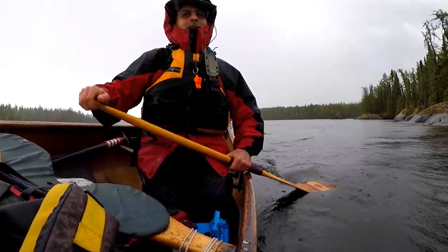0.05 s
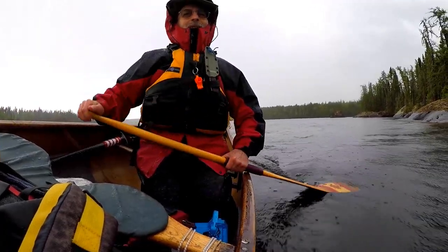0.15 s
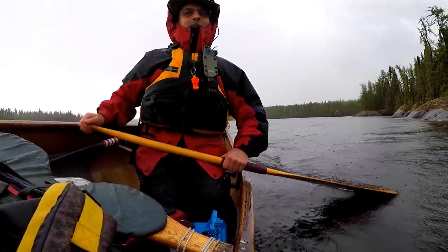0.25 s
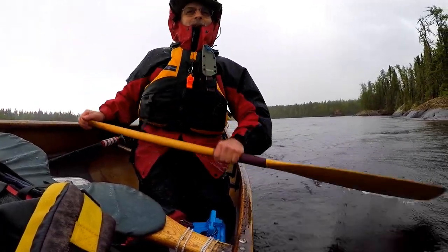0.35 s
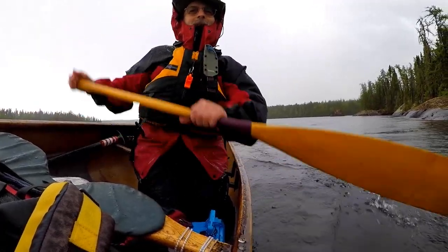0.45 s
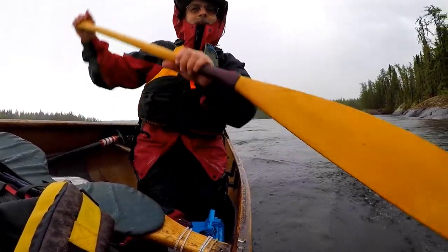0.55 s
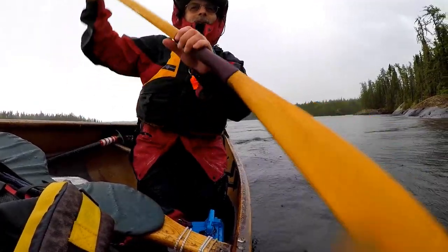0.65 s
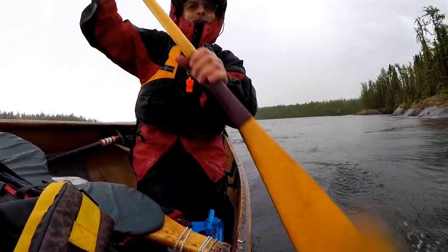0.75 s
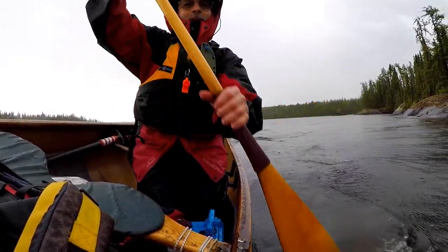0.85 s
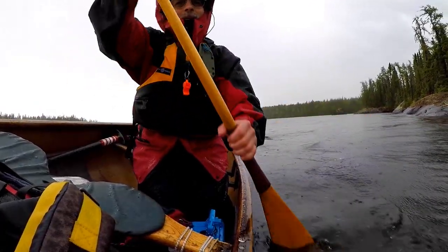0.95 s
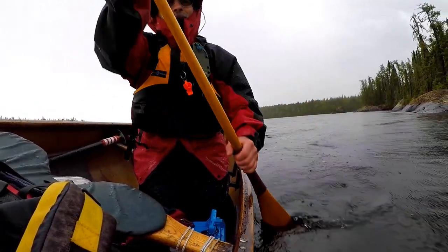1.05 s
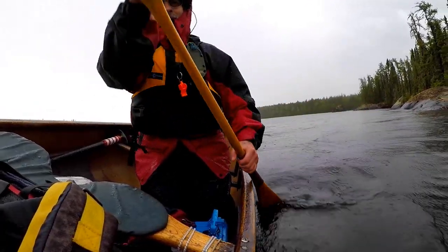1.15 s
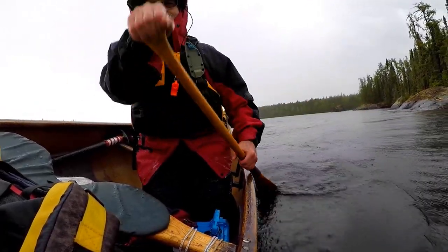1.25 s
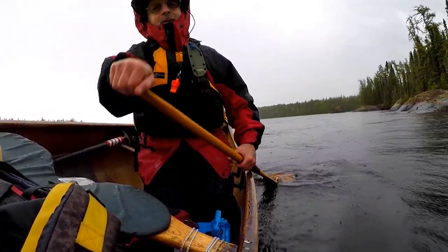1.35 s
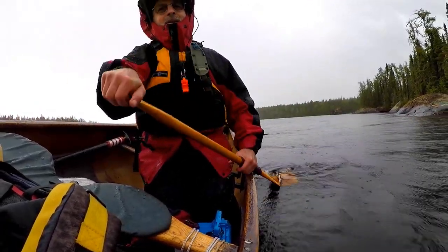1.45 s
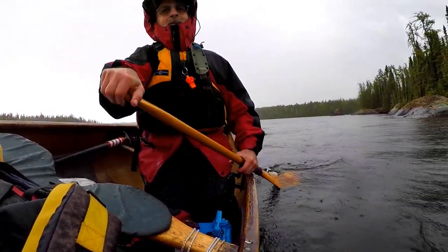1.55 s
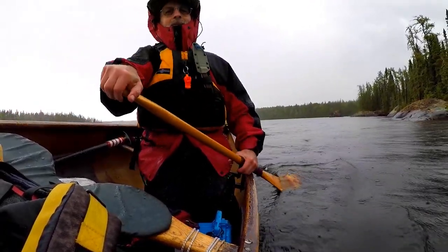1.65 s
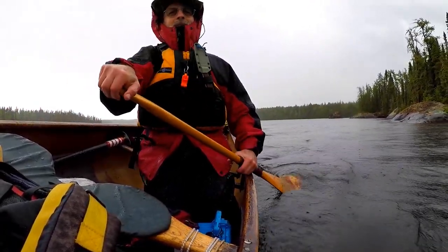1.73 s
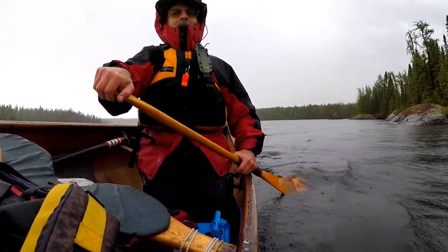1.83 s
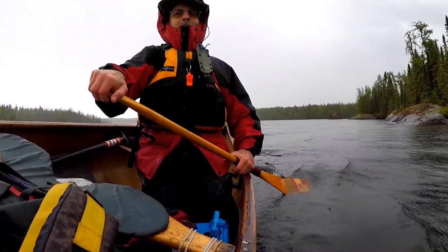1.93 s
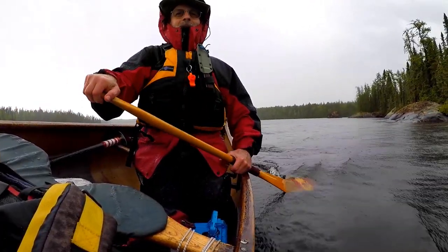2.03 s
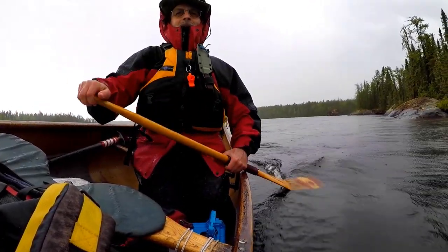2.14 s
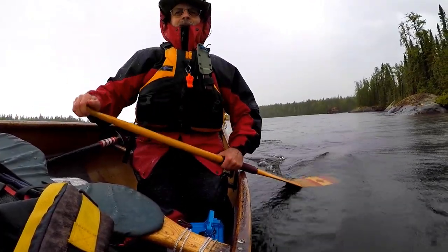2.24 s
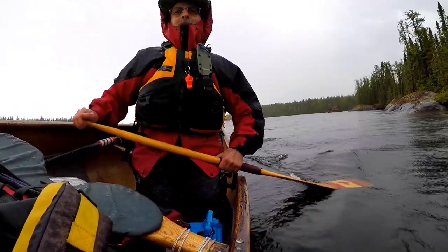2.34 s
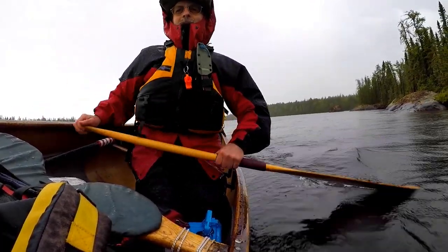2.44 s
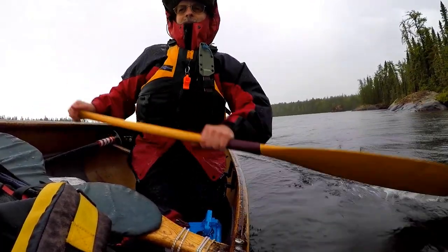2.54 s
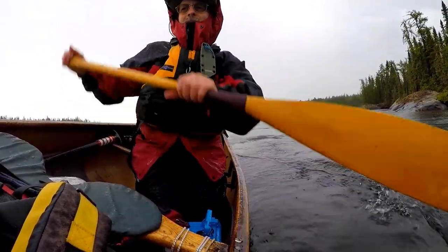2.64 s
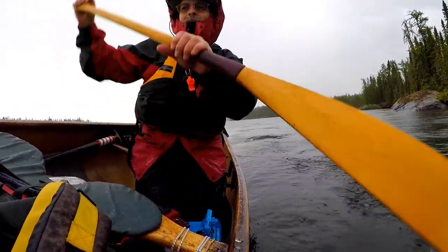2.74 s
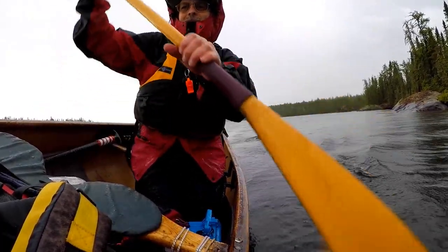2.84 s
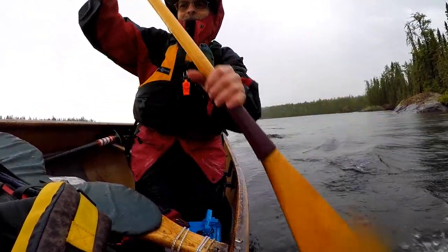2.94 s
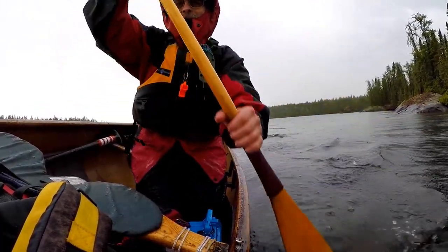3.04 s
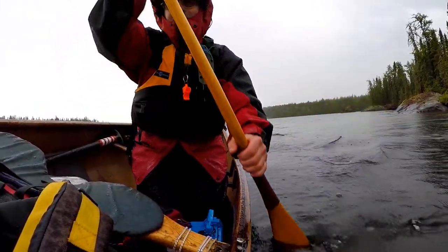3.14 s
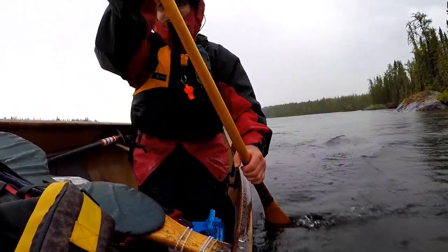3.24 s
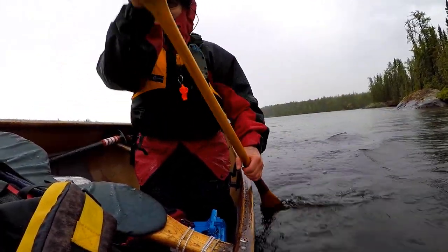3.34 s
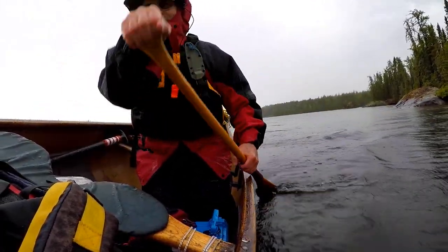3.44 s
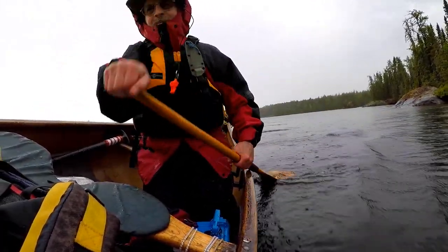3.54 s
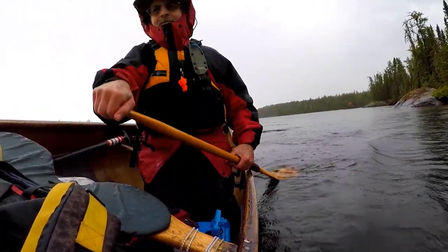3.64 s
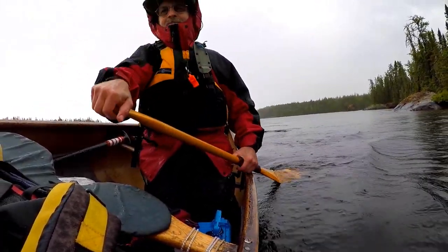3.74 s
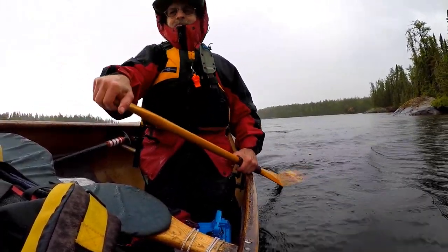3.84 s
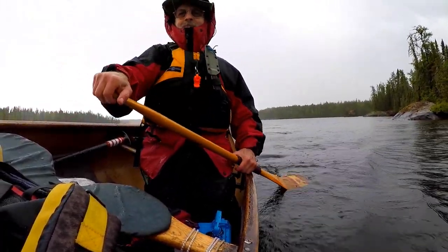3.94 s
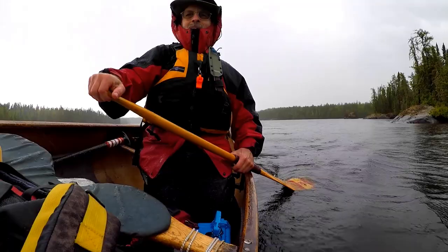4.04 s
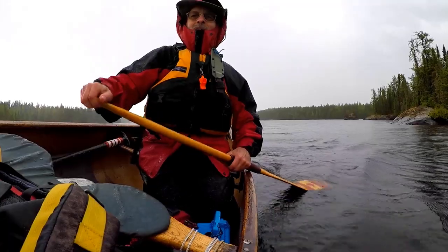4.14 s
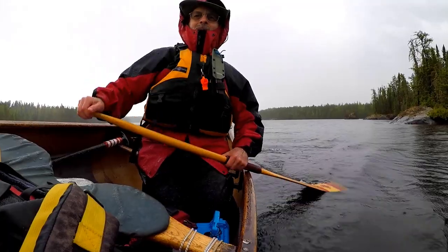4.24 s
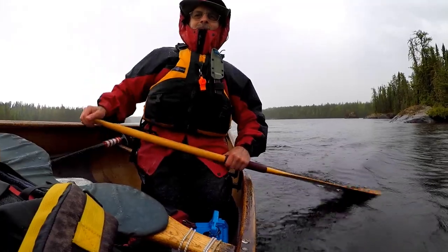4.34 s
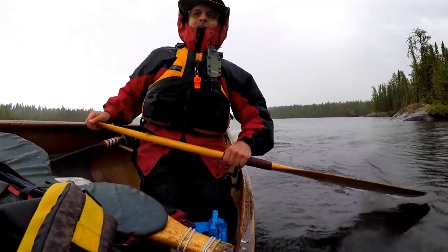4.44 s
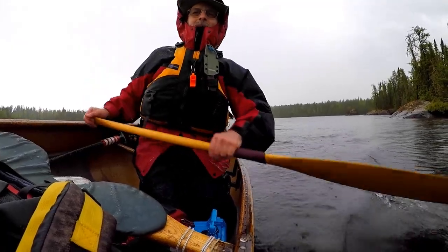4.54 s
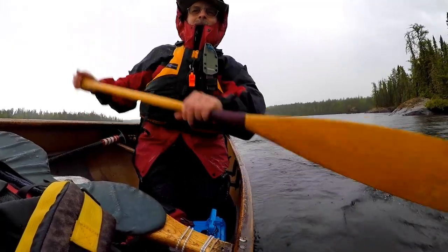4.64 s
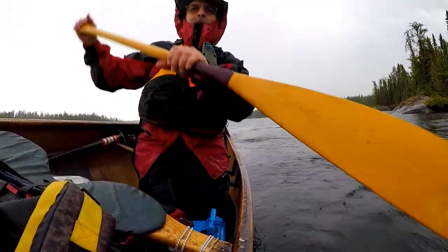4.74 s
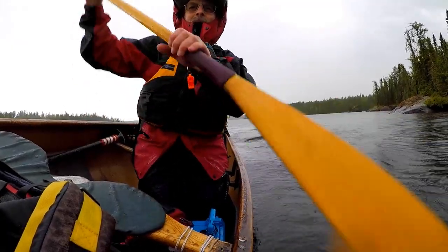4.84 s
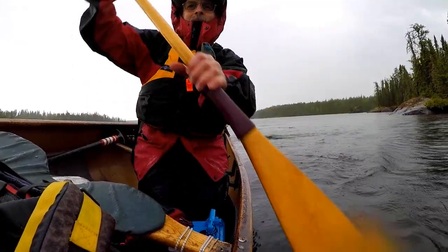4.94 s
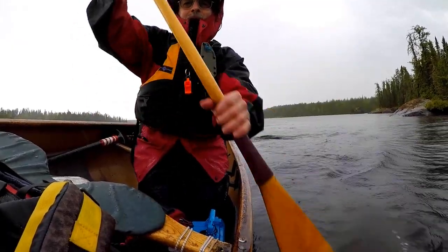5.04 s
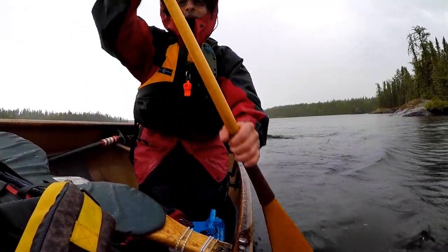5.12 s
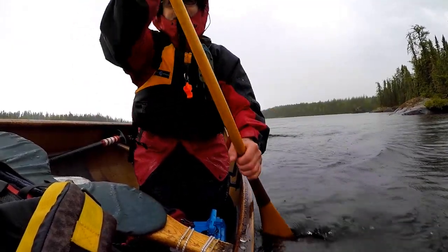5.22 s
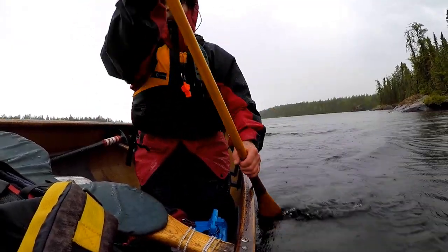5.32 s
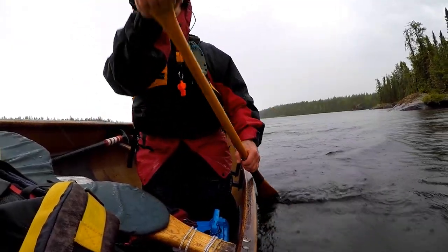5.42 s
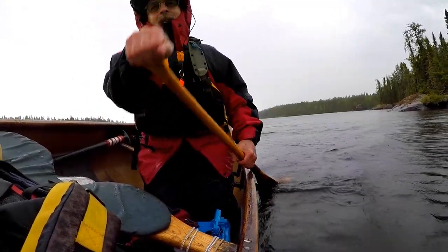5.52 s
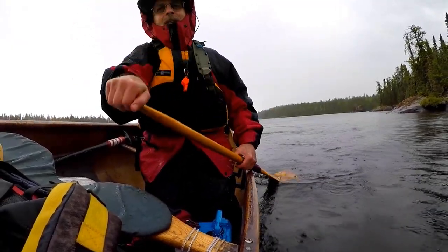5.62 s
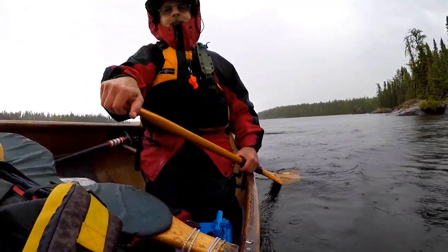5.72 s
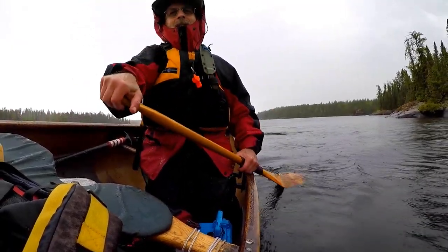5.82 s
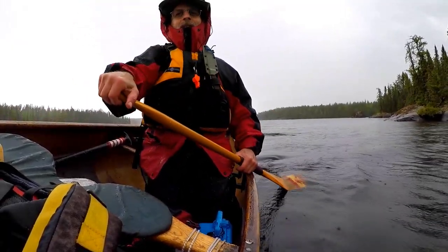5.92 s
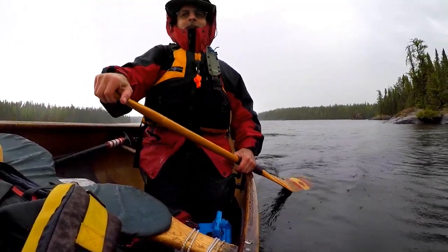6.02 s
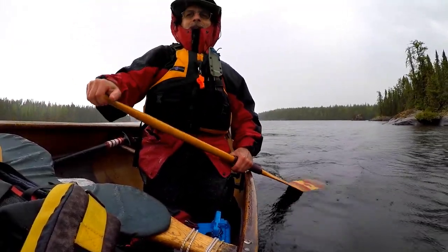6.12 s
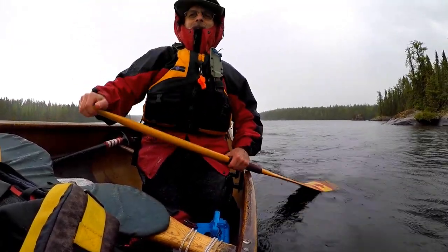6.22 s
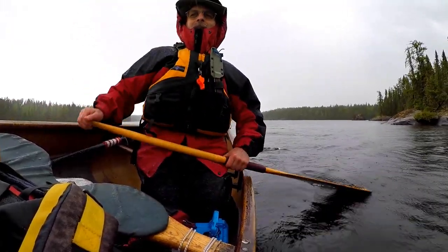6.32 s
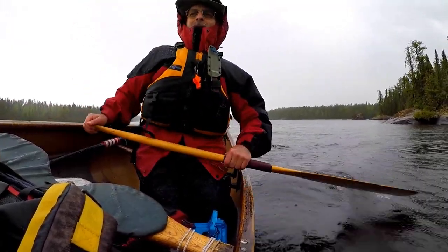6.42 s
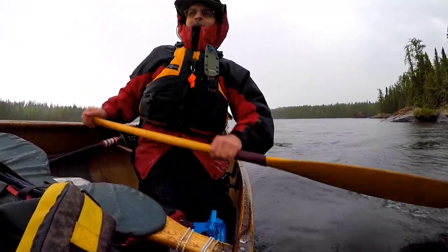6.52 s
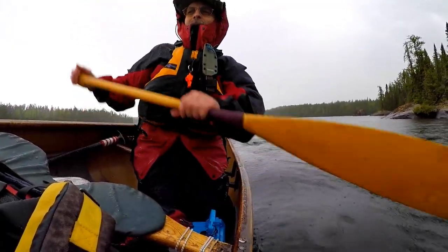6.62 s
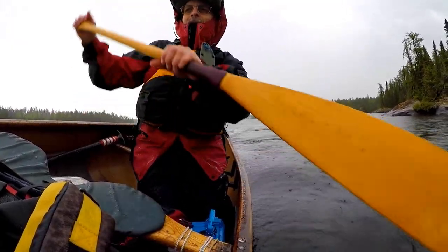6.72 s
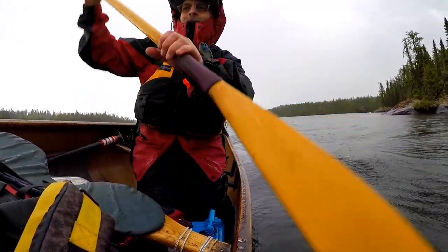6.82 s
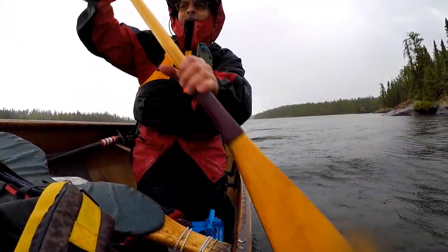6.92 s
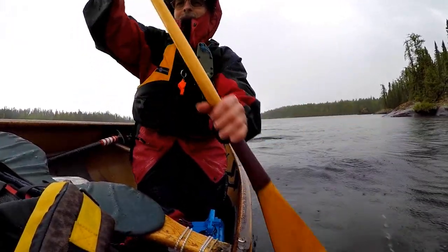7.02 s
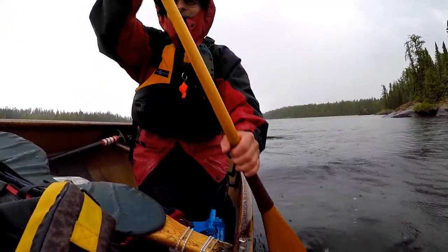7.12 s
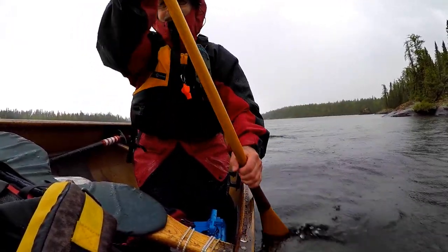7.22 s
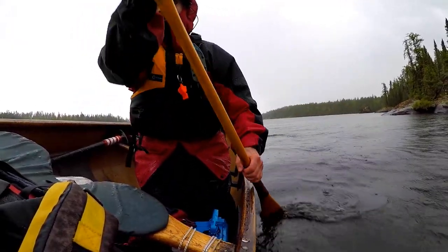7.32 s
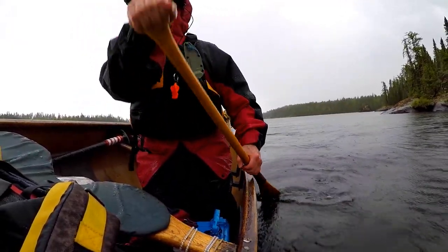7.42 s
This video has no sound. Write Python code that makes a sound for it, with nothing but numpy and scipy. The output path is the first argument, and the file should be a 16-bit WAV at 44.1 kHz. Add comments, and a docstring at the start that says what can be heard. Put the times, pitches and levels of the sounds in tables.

```python
"""Canoe on an open lake, light rain

The microphone is a small camera's, fixed to the hull of a paddled canoe, with no echo off the open water.
On the port itself: wind, as three bands of shaped noise. Through the hull: gulps, sagging tones.
Close by: water and splashes (bubble crowds), plops (rising tones), and drops that ring the housing,
with wide cracks, bright snaps and dull bodies of shaped noise. Far off: rain, a wavering hiss.
Patches and bands of treble hiss come and go, made of short high grains and noise.
"""
import sys
import numpy as np
from scipy import signal
from scipy.fft import rfft, irfft, next_fast_len
from scipy.io import wavfile
from scipy.ndimage import uniform_filter1d

SR = 44100
rng = np.random.default_rng(int(sys.argv[2]) if len(sys.argv) > 2 else 0)


def bounce(signal):
    """Save signal as a 16-bit WAV file at the path given by the first command-line argument."""
    frames = np.transpose(np.atleast_2d(signal))
    limited = np.clip(frames, -1, 1)
    pcm = np.round(limited * 32767).astype(np.int16)
    wavfile.write(sys.argv[1], SR, pcm)


N = 329406

# wind at the port: [t/s, slow push level/dB, deep buffet level/dB, faster flutter level/dB]
WIND_LEVELS = [(0.0, -50, -21, -30), (0.04, -13, -22.5, -30), (1.1, -26, -24.5, -29),
               (1.58, -18.5, -32.5, -29), (1.93, -22, -23, -28.5), (2.77, -18.5, -17.5, -23),
               (3.06, -39, -33.5, -32.5), (3.14, -15, -15.5, -24.5), (3.29, -27, -20, -28),
               (3.58, -20.5, -38, -20), (3.68, -32, -29.5, -29), (3.95, -23.5, -38, -35),
               (4.31, -17, -17.5, -21), (4.45, -18, -18, -24), (5.26, -26.5, -33.5, -29),
               (5.45, -21, -27, -18.5), (5.66, -16.5, -22.5, -32), (5.97, -17, -36.5, -28.5),
               (6.22, -11.5, -18, -25.5), (6.72, -29, -33.5, -33), (7.39, -17, -17.5, -28.5),
               (7.47, -61, -49, -29)]
# spectra of the three wind layers: [f/Hz, level/dB]
PUSH_SPECTRUM = [(4, -20), (10, -3.5), (20, -1), (30, -4.5), (50, -35)]
BUFFET_SPECTRUM = [(18, -29), (30, -35), (45, -10.5), (70, -11.5), (100, -13.5), (150, -42), (300, -58)]
FLUTTER_SPECTRUM = [(40, -64.5), (80, -5), (130, 1), (200, -4.5), (260, -14), (400, -28), (700, -32),
                    (1200, -55)]
# swash along the hull, before its flicker: [t/s, level/dB]
WATER_LEVELS = [(0.0, -41), (1.1, -44.5), (3.1, -44), (3.56, -43.5), (3.68, -50.5), (3.95, -51.5),
                (4.35, -45.5), (5.32, -43.5), (5.91, -51), (6.26, -42), (6.8, -47.5), (7.09, -40.5),
                (7.47, -58.5)]
# spectrum shared by swash, splashes and dull bodies: [f/Hz, level/dB]
SWASH_SPECTRUM = [(250, -0.5), (400, -5.5), (700, -4.5), (1000, -4), (1600, -1.5), (2400, 0), (2800, -4.5),
                  (3200, -8), (4300, -46.5)]
# rain on the far lake, before it wavers: [t/s, level/dB]
RAIN_LEVELS = [(0.0, -61), (3.1, -60.5), (3.87, -68), (4.72, -58), (5.1, -61), (5.87, -61), (7.47, -59.5)]
# spectrum of the far rain: [f/Hz, level/dB]
RAIN_SPECTRUM = [(1650, -36), (2800, -22.5), (3380, -1), (4900, -6), (6800, -6), (10100, -5.5),
                 (12800, -14), (15200, -17.5), (15800, -42)]
# larger drops on the housing: [t/s, low ring drive level/dB, high ring drive level/dB]
HOUSING_DROPS = [(.02, -39, -42), (.439, -46, -70), (2.787, -45, -49), (3.016, -51, -41), (3.205, -46, -71),
                 (5.903, -36, -52), (5.992, -50, -38), (0.1566, -33, -42), (0.17, -31.5, -51),
                 (0.182, -37, -50), (0.2054, -31, -44), (0.2224, -22, -22.5), (0.4088, -27.5, -36),
                 (0.5482, -41, -38.5), (0.629, -35, -37), (0.6446, -32.5, -29), (0.749, -39, -60),
                 (.651, -38, -38.5), (2.408, -48.5, -50), (4.522, -41, -42), (4.825, -55, -45),
                 (4.901, -50, -39), (5.412, -39, -33), (1.0164, -27, -20), (1.1236, -38.5, -56),
                 (1.1505, -26, -55), (1.1954, -27.5, -41), (1.225, -38, -58), (1.504, -28, -48),
                 (1.623, -45, -48), (1.6302, -39.5, -37), (2.14, -41.5, -58), (2.3171, -30, -33),
                 (2.3406, -32, -40), (2.5234, -33, -40), (2.647, -27.5, -24.5), (2.8903, -42, -57),
                 (3.042, -34, -46), (3.0545, -27, -30), (3.0746, -33, -30), (3.0884, -26.5, -29),
                 (1.101, -50, -51.5), (1.838, -49, -52), (4.132, -43.5, -62), (3.1273, -40, -55),
                 (3.2375, -34, -52), (3.4111, -34, -53), (3.4431, -37, -52), (3.5982, -44, -59),
                 (3.641, -36.5, -65), (4.391, -31.5, -30.5), (4.4884, -28, -28.5), (4.5421, -38.5, -39),
                 (4.671, -30, -22), (4.882, -29, -54), (4.9197, -32.5, -55), (5.2902, -17, -55),
                 (5.3835, -43, -34), (5.3993, -24, -23), (5.406, -17.5, -44), (5.7216, -42, -39),
                 (5.7869, -25, -29), (5.9653, -28.5, -37), (6.1779, -43, -54), (6.26, -38.5, -41),
                 (6.4597, -28, -27), (6.614, -35, -23.5), (6.7501, -32, -31.5), (6.982, -30, -53),
                 (7.0374, -45, -38), (7.0652, -18.5, -16), (7.106, -46, -30), (7.3442, -29, -34.5)]
# housing modes, low and high: [f/Hz, level/dB relative to the drive]
LOW_MODES = [(2600, 1), (3600, 1)]
HIGH_MODES = [(4600, 1), (5700, -1.5)]
# spectrum of a drop's wide crack: [f/Hz, level/dB]
CRACK_SPECTRUM = [(1500, -16), (3400, 14), (5000, 4.5), (7200, -3), (9500, -3), (11500, -23), (12800, -8),
                  (15000, -25.5)]
# bright snap of a drop, often together with its ring: [t/s, level/dB before the spectrum]
DROP_SNAPS = [(0.2059, -42), (0.2225, -37), (0.6432, -37.5), (0.747, -39.5), (1.0174, -42.5),
              (1.1506, -32.5), (1.505, -41.5), (2.317, -41), (2.3401, -39), (2.7781, -40), (2.8769, -46),
              (2.8898, -38), (3.5982, -42), (3.9763, -40.5), (4.3894, -32.5), (4.4877, -38.5),
              (4.9013, -39), (4.9202, -37), (5.29, -40), (5.3842, -34.5), (5.7873, -38), (6.4597, -35.5),
              (6.6144, -46), (6.7506, -47), (6.983, -33.5), (7.0983, -40)]
# spectrum of a bright snap: [f/Hz, level/dB]
SNAP_SPECTRUM = [(6000, -37), (8500, 4.5), (11000, -2.5), (12800, 1), (15500, -12.5)]
# bursts of churned water at blade and hull: [t/s, level/dB, 60 dB decay/s]
SPLASH_BURSTS = [(0.109, -34.5, 0.45), (0.723, -26, 0.17), (1.199, -21.5, 0.29), (2.499, -35.5, 0.12),
                 (2.629, -32, 0.1), (2.856, -22.5, 0.19), (3.004, -31.5, 0.38), (3.477, -30, 0.26),
                 (4.368, -40.5, 1), (4.902, -28, 0.15), (5.409, -40, 0.86), (5.481, -36, 0.082),
                 (5.932, -37, 0.22), (6.35, -38.5, 0.14), (6.875, -30, 0.44), (7.255, -43, 0.35),
                 (7.349, -36, 0.52)]
# air pockets gulped by the blade, before roughening: [t/s, level/dB, starting f/Hz, length/s]
AIR_POCKETS = [(0.113, -15.5, 260, 0.017), (.13, -10, 170, 0.025), (0.218, -15, 227, 0.037),
               (0.291, -20, 215, 0.042), (1.184, -3, 222.4, 0.073), (1.226, -1.5, 219, 0.067),
               (1.266, -6.5, 260.5, 0.038), (1.29, -7.5, 201, 0.06), (1.407, -12.5, 206, 0.025),
               (1.773, -11, 144, 0.047), (2.86, -8.5, 200, 0.053), (3.177, -8, 149, 0.027),
               (3.458, -4, 209, 0.021), (3.473, 0, 301.6, 0.026), (3.492, -7, 135, 0.077),
               (3.606, -11.5, 314, 0.034), (3.642, -16.5, 250, 0.034), (4.381, -16, 218, 0.031),
               (4.665, -23.5, 344, 0.016), (5.289, -2, 110, 0.022), (5.303, -5, 290, 0.022),
               (5.322, -11.5, 241, 0.029), (5.378, -11, 215, 0.041), (5.455, -8.5, 329, 0.026),
               (5.467, -4.5, 134, 0.05), (5.524, -13.5, 107, 0.081), (5.734, -23.5, 378, 0.043),
               (5.884, -16, 344, 0.022), (5.9, -11, 195, 0.04), (6.865, -20.5, 215.6, 0.11),
               (7.059, -12, 350, 0.021), (7.122, -16, 151, 0.02), (7.255, -11.5, 301, 0.013),
               (7.27, -2.5, 263, .03), (7.308, -8.5, 145.5, 0.076), (7.344, -8, 97.5, 0.053),
               (7.391, -3.5, 163, 0.025)]
# single bubbles and plops, before roughening: [t/s, level/dB, starting f/Hz, 60 dB decay/s]
SINGLE_BUBBLES = [(.123, -29, 1070, 0.014), (.158, -21.5, 724, 0.031), (.168, -24.5, 2330, 0.016),
                  (0.222, -12, 790, 0.0025), (.549, -23, 706, 0.017), (0.688, -26, 1270, 0.033),
                  (0.74, -15, 479, 0.048), (0.737, -20, 2280, .012), (.745, -12, 1700, 0.0025),
                  (.749, -16, 2250, 0.022), (.768, -28, 1540, 0.027), (.789, -34, 2250, 0.036),
                  (.851, -34.5, 2400, 0.051), (0.895, -27.5, 2240, 0.024), (.95, -34.5, 2040, 0.041),
                  (1.006, -30, 2360, 0.03), (1.017, -26, 2400, 0.028), (1.211, -11, 1680, 0.0058),
                  (1.218, -10, 1470, 0.0028), (1.228, -19, 787, 0.019), (1.246, -20.5, 1005, 0.017),
                  (1.29, -31, 2150, .02), (1.313, -34, 2220, 0.03), (1.366, -26, 914, 0.054),
                  (1.487, -39, 1660, 0.03), (1.608, -16, 538, 0.026), (1.634, -21, 583, 0.039),
                  (2.173, -25.5, 1980, 0.022), (2.255, -28, 1620, 0.013), (2.298, -28, 2190, 0.017),
                  (2.415, -30, 437, 0.049), (2.524, -23.5, 665, 0.045), (2.62, -28, 533, 0.048),
                  (2.638, -24.5, 720, .025), (2.788, -30, 720, 0.027), (2.818, -35, 1340, 0.033),
                  (2.88, -19, 2070, 0.012), (2.906, -24, 520, 0.027), (2.841, -26.5, 2030, 0.039),
                  (2.866, -16.5, 664, 0.03), (2.889, -17, 2100, 0.016), (3.025, -22.5, 2124, 0.043),
                  (3.03, -27, 1030, 0.032), (3.062, -25, 1320, 0.026), (3.156, -35, 2870, 0.028),
                  (3.253, -31, 1210, 0.037), (3.415, -20.5, 1530, 0.0051), (3.504, -19.5, 1080, 0.0064),
                  (3.639, -30, 1640, 0.029), (3.668, -32, 734, 0.06), (3.884, -29, 317, 0.021),
                  (3.907, -24, 572, 0.076), (3.935, -39, 1070, 0.048), (4.131, -25, 1670, 0.011),
                  (4.385, -23.5, 520, 0.048), (4.391, -25.5, 2360, 0.02), (4.468, -26, 516, 0.038),
                  (4.49, -23.5, 800, 0.008), (4.882, -25, 2400, 0.0059), (4.898, -26, 2470, 0.07),
                  (4.918, -10.5, 1990, 0.0021), (4.922, -29, 2730, 0.027), (5.278, -22, 512, 0.024),
                  (5.405, -11.5, 2460, 0.0081), (5.411, -18.5, 1900, .008), (5.441, -27, 1600, 0.016),
                  (5.461, -31, 1300, 0.056), (5.481, -27, 1150, 0.016), (5.465, -17.5, 2010, 0.0044),
                  (5.507, -20, 1365, 0.025), (5.513, -21.5, 1750, 0.015), (5.552, -28.5, 670, 0.03),
                  (5.798, -17, 2820, 0.0038), (5.92, -27, 586, 0.056), (5.949, -20, 880, 0.0044),
                  (6.178, -18.5, 3010, 0.0071), (6.74, -28.5, 2750, 0.0046), (6.461, -12.5, 640, 0.0071),
                  (6.473, -35, 750, 0.052), (6.9, -19, 1080, 0.022), (6.905, -15, 2300, 0.0067),
                  (6.93, -23, 2210, 0.013), (7.02, -33, 2000, .015), (7.036, -30, 546, 0.046),
                  (7.054, -22, 444, 0.014), (7.054, -28, 2520, 0.02), (7.108, -31, 914, 0.0091),
                  (7.266, -33, 1340, 0.02), (7.269, -9.5, 390, 0.016), (7.327, -34, 736, 0.017),
                  (7.352, -24, 470, 0.022), (7.377, -23, 500, 0.021), (7.394, -31, 500, 0.016),
                  (7.438, -36.5, 2300, 0.029), (7.449, -23.5, 268, 0.014), (7.303, -17, 367, 0.036),
                  (7.378, -13, 2770, 0.0045), (7.392, -22.5, 1920, .0063)]
# low note that rings on after the blade swings past, before roughening: [t/s, level/dB]
AFTER_RINGS = [(.748, -21.5), (3.05, -25)]
# wide, dull body of a drop's tick or a plop: [t/s, level/dB before the spectrum]
DULL_BODIES = [(0.745, -3.5), (0.158, -16.5), (0.204, -30), (0.217, -17.5), (0.549, -17.5), (1.401, -23),
               (1.487, -11), (1.701, -22.5), (2.253, -20.5), (3.137, -20), (4.49, -21), (4.617, -22),
               (4.882, -15), (4.918, -7), (5.411, -20), (5.551, -18), (5.798, -17), (6.179, -15.5)]
# patches of grainy treble hiss: [start t/s, length/s, starting level/dB, starting upper edge f/Hz]
HISS_PATCHES = [(0.197, 0.19, -42, 3680), (0.63, 0.17, -39, 3800), (4.482, 0.66, -49.5, 4080),
                (5.276, 0.045, -35, 4000), (5.382, 0.25, -41, 6600), (5.606, 0.18, -56, 4500),
                (5.775, 0.43, -46, 6200), (6.066, 1, -50, 3830), (7.05, 0.2, -42, 6460)]
# bands of treble hiss, steady or drifting in pitch:
# [start t/s, length/s, starting level/dB, start centre f/Hz, end centre f/Hz, width f/Hz]
HISS_BANDS = [(1.02, 0.11, -49, 5800, 5700, 700), (4.65, 0.24, -50.5, 5900, 6100, 600),
              (4.87, 0.13, -50, 6200, 7300, 900), (5.285, .08, -47, 4250, 4150, 500),
              (5.56, 0.15, -50, 4900, 6200, 1000), (6.05, 0.37, -50.5, 5400, 7100, 1300),
              (6.597, 0.26, -49.5, 5900, 5900, 1400)]

SMALL_DROPS, SMALL_DROP_DB = 16, 16  # count; drive above the far rain before the size spread
# crack drive of a usual drop before the spectrum; dB of crack per dB of ring; ring drive of a usual drop
CRACK_DB, CRACK_GROWTH, USUAL_DROP_DB = -36.5, 0.53, -24.5
SPLASH_RISE_S = 0.014
SAG_PIVOT_HZ, SAG_POWER = 59.9, 0.75  # the higher a pocket starts above the pivot, the further it sags
CLIMB_HZ_PER_S = 8500  # times the tabled decay, this is the rise in Hz over one decay
SWELL_SHARE = 0.06  # share of the decay added to a bubble's swell-in
AFTER_RING_HZ, AFTER_RING_T60_S = 500, 0.14
HISS_LOW_HZ, HISS_SINK = 3080, 0.2  # lower edge of a patch; share of its width lost at the top by the end
HISS_RAGGED_HZ, HISS_MOTTLE_DB = 130, 1.9  # rms wander of the upper edge; rms unevenness
BAND_LIMIT_HZ = 15900


def amp(db):
    """Decibels to gain."""
    return 10 ** (np.asarray(db) / 20)


def evened(x):
    """Scales to rms 1."""
    return x / np.sqrt(np.mean(x ** 2) + 1e-20)


def curve(rows, order):
    """One column of a time table at every sample."""
    table = np.array(rows)
    return np.interp(np.arange(N) / SR, table[:, 0], table[:, order])


def coloured(x, points):
    """Shapes x by a spectrum joined up on a log-frequency axis; -90 dB outside it."""
    hz, db = np.transpose(points)
    size = next_fast_len(len(x))
    log_hz = np.log(np.fft.rfftfreq(size, 1 / SR) + 1)
    shape = amp(np.interp(log_hz, np.log(hz), db, -90, -90))
    return irfft(rfft(x, size) * shape, size)[:len(x)]


def lumps(seconds):
    """Slow chance of rms 1 whose humps last about this long."""
    size = max(int(seconds * SR), 2)
    smooth = uniform_filter1d(rng.standard_normal(N), size)
    return evened(uniform_filter1d(smooth, size))


def add(mix, s, sound):
    """Mixes a sound in at time s."""
    part = mix[max(round(s * SR), 0):][:len(sound)]
    part += sound[:len(part)]


def bubble(hz, t60, octaves, rise):
    """A ring swells in, then decays 60 dB per t60 while its pitch climbs by so many octaves per t60."""
    t = np.arange(int((t60 + rise) * SR) + 8) / SR
    turns = np.cumsum(hz * 2 ** (octaves * t / t60)) / SR
    swell = np.sin(np.pi / 2 * np.minimum(t / rise, 1)) ** 2
    decay = amp(-60 * np.maximum(t - rise, 0) / t60)
    return np.sin(2 * np.pi * turns) * decay * swell


def burble(low_hz, high_hz, per_s, cycles, spread_db):
    """A crowd of short rising rings of many pitches, decaying over so many cycles; a few are much louder."""
    out, pitches = np.zeros(N), np.geomspace(low_hz, high_hz, num=24)
    loudness = amp(spread_db * np.minimum(rng.exponential(1, N), 5))
    strikes = loudness * (rng.random(N) < per_s / SR)
    kind = rng.integers(0, len(pitches), N)
    for k, hz in enumerate(pitches):
        one = bubble(hz, cycles / hz, 0.249, 0.98 / hz)
        out += signal.oaconvolve(strikes * (kind == k), one)[:N]
    return evened(out)


def wind(lumpy_db):
    """Turbulence at the port: a slow push, a deep buffet and a faster, lumpier flutter."""
    push = evened(coloured(rng.standard_normal(N), PUSH_SPECTRUM))
    buffet = evened(coloured(rng.standard_normal(N), BUFFET_SPECTRUM))
    gusty = rng.standard_normal(N) * amp(lumpy_db * lumps(0.062))
    flutter = evened(coloured(gusty, FLUTTER_SPECTRUM))
    return sum(amp(curve(WIND_LEVELS, k)) * part for k, part in enumerate([push, buffet, flutter], 1))


def water():
    """Swash along the hull: a bubble crowd over a smooth hiss of unresolved ones."""
    crowd = burble(350, 3000, per_s=1100, cycles=42, spread_db=3.1)
    swash = crowd + 0.8 * rng.standard_normal(N)
    flicker_db = 1.1 * lumps(0.012) + 1.5 * lumps(0.08)
    return evened(coloured(swash, SWASH_SPECTRUM)) * amp(curve(WATER_LEVELS, 1) + flicker_db)


def rain(patter):
    """Countless far drops blur to a hiss that wavers; nearer ones patter through it."""
    loudness = amp(6.3 * np.minimum(rng.exponential(1, N), 5))
    near = loudness * (rng.random(N) < 150 / SR) * rng.choice([-1, 1], N)  # 150 drops a second
    hiss = evened(coloured(rng.standard_normal(N) + patter * evened(near), RAIN_SPECTRUM))
    return hiss * amp(curve(RAIN_LEVELS, 1) + 1.0 * lumps(0.017))


def ticks(ring_t60, crack_s):
    """Drops ring the housing low or high by where they land, with a wide crack and at times a bright snap."""
    ring, crack, snap = np.zeros(N), np.zeros(N), np.zeros(N)
    t = np.arange(200) / SR
    # small drops fall at random times, their drive tied to the rain's level
    when, size, place = rng.random((SMALL_DROPS, 3)).T
    level = curve(RAIN_LEVELS, 1)[(when * N).astype(int)] + SMALL_DROP_DB - 4.7 * size
    small = np.transpose([when * N / SR, level - 8.0 * place, level - 7.2 * (1 - place)])
    low, high = (sum(amp(db) * bubble(hz, ring_t60, 0, 0.0004) for hz, db in modes)
                 for modes in (LOW_MODES, HIGH_MODES))
    for s, low_db, high_db in np.vstack([HOUSING_DROPS, small]):
        add(ring, s, amp(low_db) * low + amp(high_db) * high)
        crack_db = CRACK_DB + CRACK_GROWTH * (max(low_db, high_db) - USUAL_DROP_DB)
        pulse = np.exp(-(t / crack_s - 1.3) ** 2)
        add(crack, s, amp(crack_db) * pulse * rng.standard_normal(len(t)))
    for s, db in DROP_SNAPS:
        add(snap, s, amp(db) * np.exp(-t / crack_s) * rng.standard_normal(len(t)))
    return ring + coloured(crack, CRACK_SPECTRUM) + coloured(snap, SNAP_SPECTRUM)


def splashes():
    """A dense, crackling crowd of bubbles bursts out and thins away."""
    force = np.zeros(N)
    for s, db, t60 in SPLASH_BURSTS:
        t = np.arange(int((SPLASH_RISE_S + t60) * SR)) / SR
        decay = amp(db - 60 * np.maximum(t - SPLASH_RISE_S, 0) / t60)
        add(force, s, decay * np.minimum(t / SPLASH_RISE_S, 1))
    crowd = burble(450, 3000, per_s=2600, cycles=28, spread_db=2.8) * amp(1.5 * lumps(0.003))
    return force * evened(coloured(crowd, SWASH_SPECTRUM))


def gulps(wobble, ragged_db):
    """Each pocket swells, rings and sags in pitch, wobbling and beating as it breaks in two."""
    out, chance, breakup = np.zeros(N), lumps(0.0045), amp(ragged_db * lumps(0.0014))
    for s, db, start_hz, length in AIR_POCKETS:
        end_hz = SAG_PIVOT_HZ * (start_hz / SAG_PIVOT_HZ) ** SAG_POWER
        u = np.arange(int(2 * length * SR)) / (length * SR)  # time in lengths
        shake = chance[round(s * SR):][:len(u)]
        u = u[:len(shake)]
        hz = (end_hz + (start_hz - end_hz) * np.exp(-2.2 * u)) * (1 + wobble * shake)
        turns = 2 * np.pi * np.cumsum(hz) / SR
        swell = np.minimum(u / 0.15, 1) ** 2 * np.exp(-1.6 * u ** 2)
        tone = np.sin(turns) + 0.13 * np.sin(1.8 * turns) + 0.072 * np.sin(2.1 * turns)
        add(out, s, amp(db) * swell * tone)
    return out * breakup


def plops():
    """Single bubbles climb in pitch as they rise; the churned water around them roughens the ring."""
    out = np.zeros(N)
    for s, db, hz, t60 in SINGLE_BUBBLES:
        rise = 2.5 / hz + SWELL_SHARE * t60
        octaves = np.log2(1 + CLIMB_HZ_PER_S * t60 / hz)
        ring = bubble(hz, max(t60, 0.003), octaves, rise)  # no decay shorter than 3 ms
        add(out, s - 0.6 * rise, amp(db) * ring)  # starts early, so the swell straddles the tabled time
    for s, db in AFTER_RINGS:
        add(out, s, amp(db) * bubble(AFTER_RING_HZ, AFTER_RING_T60_S, 0.045, 0.0059))
    return out * (1 + 0.35 * lumps(0.0012))


def dull_bodies(length):
    """The wide, dull body of a drop's tick or a plop: a few milliseconds of noise, as wide as the swash."""
    out, t = np.zeros(N), np.arange(500) / SR
    pulse = np.exp(-(t / length - 1.2) ** 2)
    for s, db in DULL_BODIES:
        add(out, s, amp(db) * pulse * rng.standard_normal(len(t)))
    return coloured(out, SWASH_SPECTRUM)


def treble_hiss(noise_share, edge_hz, fade_db):
    """Patches of grainy hiss whose upper edge sinks as they fade, and bands steady or drifting in pitch."""
    grains = burble(3000, 9500, per_s=1500, cycles=30, spread_db=2.8)
    hiss = grains + noise_share * rng.standard_normal(N)
    flickering = evened(hiss * amp(3.2 * lumps(0.006)))
    hz, t, z = signal.stft(flickering, SR, nperseg=512, noverlap=384)
    # chance smoothed over 9 frequency bins, then 8 frames
    mottle = uniform_filter1d(rng.standard_normal(z.shape), 9, 0)
    mottle = evened(uniform_filter1d(mottle, 8, 1))
    ragged = evened(uniform_filter1d(rng.standard_normal(len(t)), 6))
    hz, opening = hz[:, None], np.zeros(z.shape)  # opening: gain by frequency and time
    for start, length, db, high_hz in HISS_PATCHES:
        u = np.clip((t - start) / length, 0, 1)
        sink_hz = HISS_SINK * (high_hz - HISS_LOW_HZ) * u ** 3
        top = high_hz - sink_hz + HISS_RAGGED_HZ * ragged
        above_low = np.clip((hz - HISS_LOW_HZ) / edge_hz + 0.5, 0, 1)
        below_top = np.clip((top - hz) / edge_hz + 0.5, 0, 1)
        fade = amp(db - fade_db * u) * (u > 0) * np.sqrt(1 - u ** 4)
        opening = np.maximum(opening, fade * above_low * below_top)
    for start, length, db, from_hz, to_hz, width_hz in HISS_BANDS:
        u = np.clip((t - start) / length, 0, 1)
        off = (hz - from_hz - (to_hz - from_hz) * u) / (width_hz / 2)
        fade = amp(db) * (u > 0) * np.sqrt(1 - u ** 4)
        opening = np.maximum(opening, fade * np.exp(-off ** 4))
    shaped = z * opening * amp(HISS_MOTTLE_DB * mottle)
    return signal.istft(shaped, SR, nperseg=512, noverlap=384)[1][:N]


def scene():
    """All sources at the one microphone on the hull; the open lake returns no echo."""
    air = wind(lumpy_db=4.5)
    shower = rain(patter=0.24) + ticks(ring_t60=0.0055, crack_s=0.0014)
    hull = gulps(wobble=0.13, ragged_db=1.1)
    wet = water() + splashes() + plops()
    bodies = dull_bodies(length=0.0021)
    treble = treble_hiss(noise_share=1.6, edge_hz=400, fade_db=5)
    return (air + shower + hull + wet + bodies + treble)[None]


def record(dry):
    """The input stage rounds off the largest swings; then the band limit."""
    rounded = 1.15 * np.tanh(dry / 1.15)
    low_pass = signal.firwin(511, BAND_LIMIT_HZ, window=("kaiser", 9), fs=SR)
    return signal.oaconvolve(rounded, low_pass[None], "same")


dry = scene()
out = record(dry)
bounce(out)
```